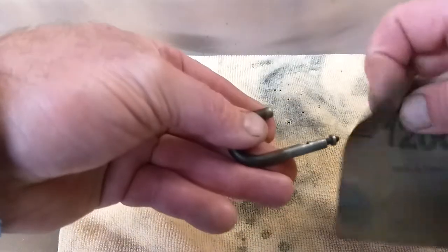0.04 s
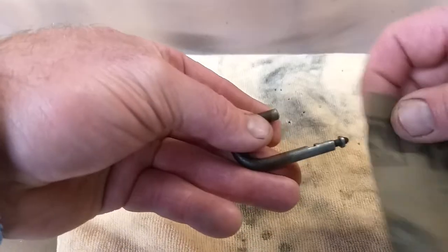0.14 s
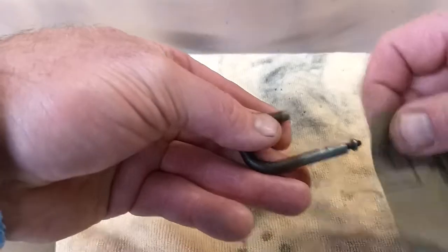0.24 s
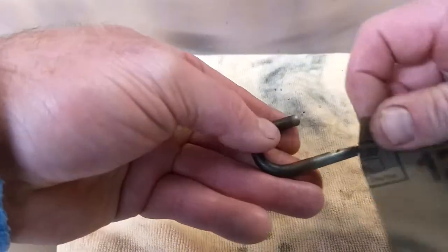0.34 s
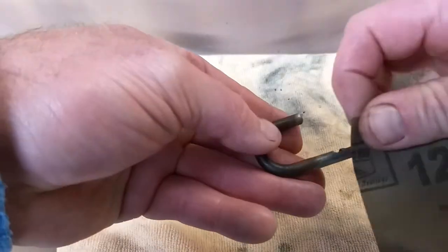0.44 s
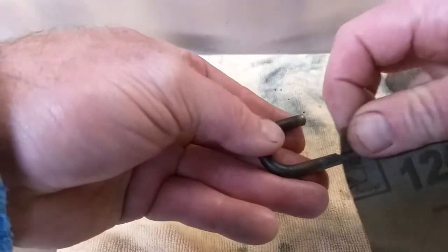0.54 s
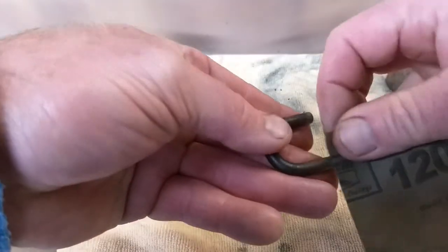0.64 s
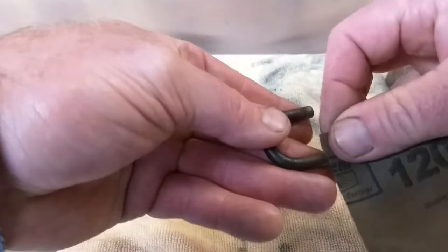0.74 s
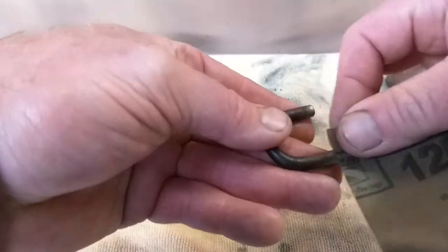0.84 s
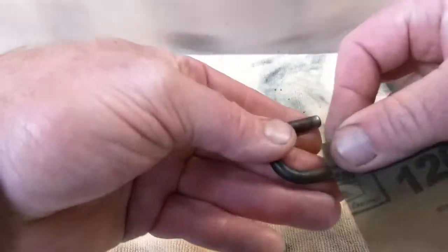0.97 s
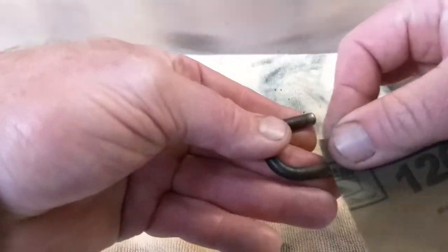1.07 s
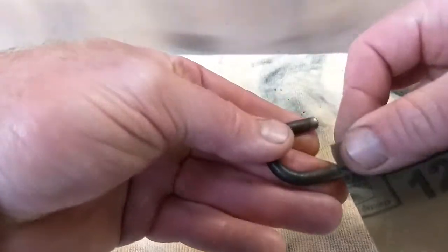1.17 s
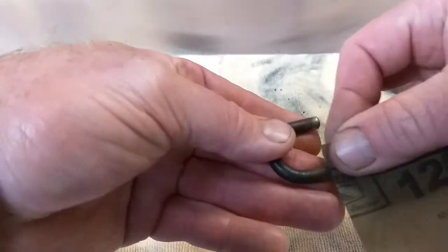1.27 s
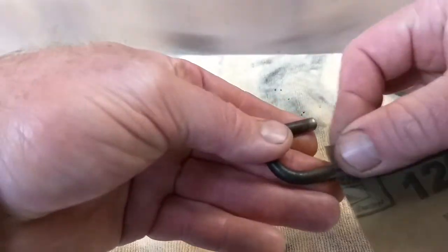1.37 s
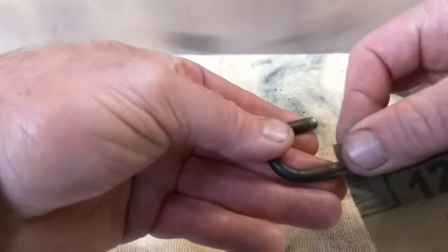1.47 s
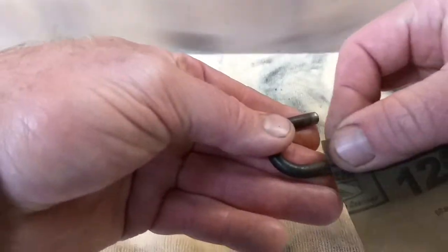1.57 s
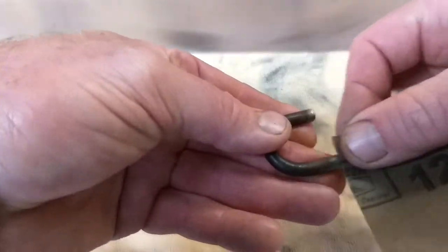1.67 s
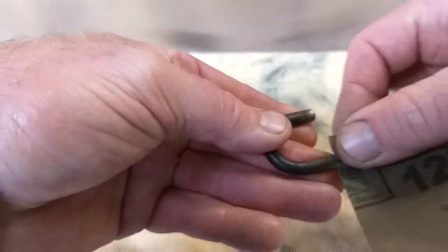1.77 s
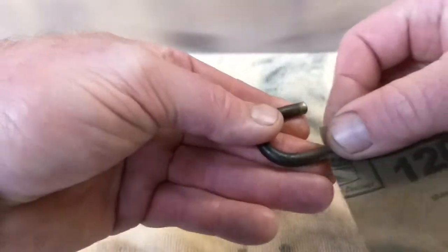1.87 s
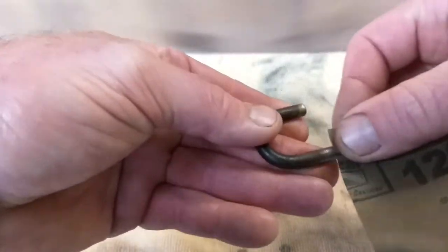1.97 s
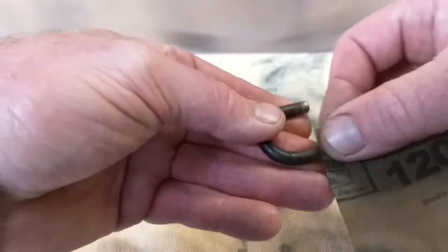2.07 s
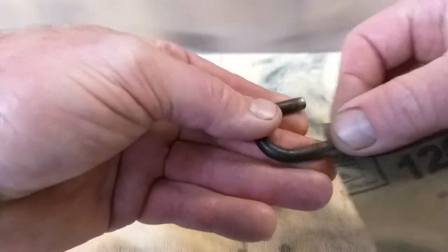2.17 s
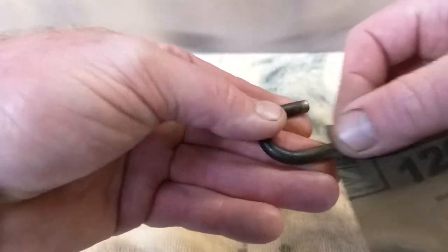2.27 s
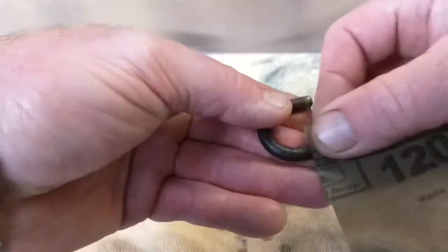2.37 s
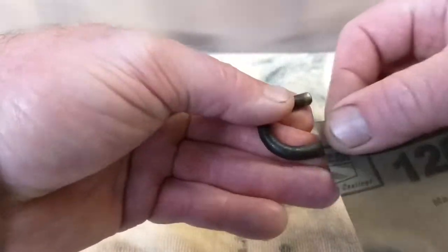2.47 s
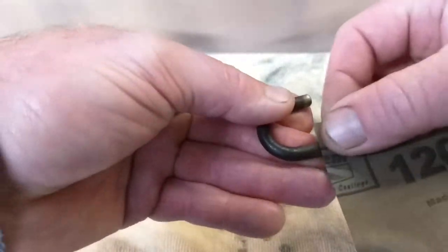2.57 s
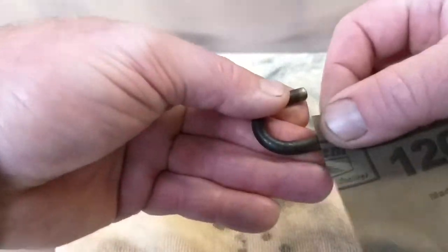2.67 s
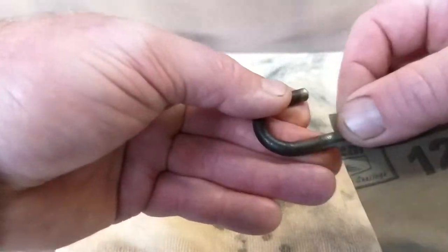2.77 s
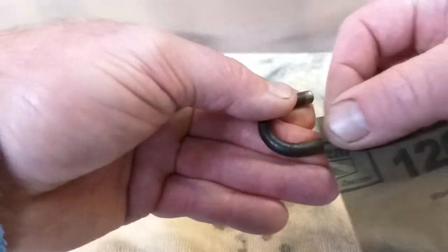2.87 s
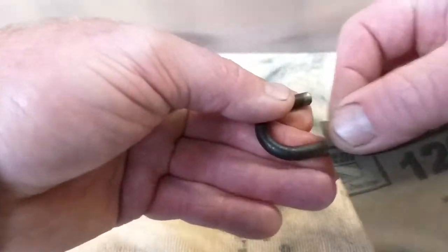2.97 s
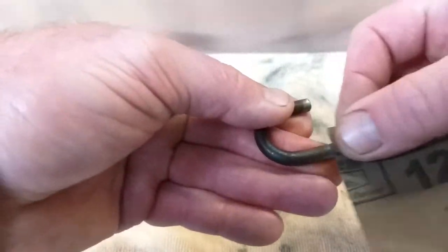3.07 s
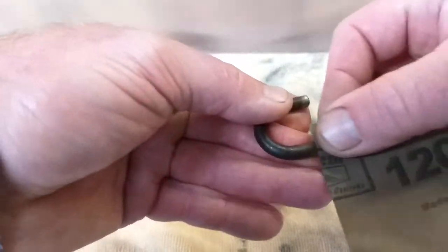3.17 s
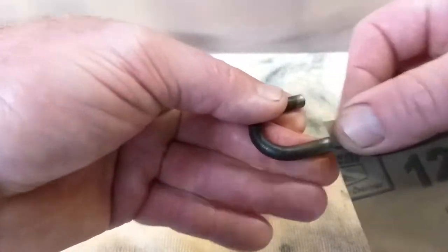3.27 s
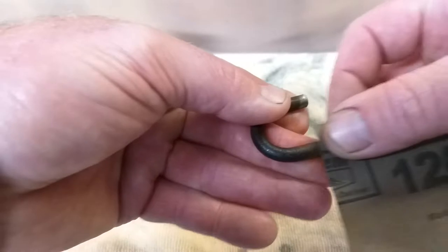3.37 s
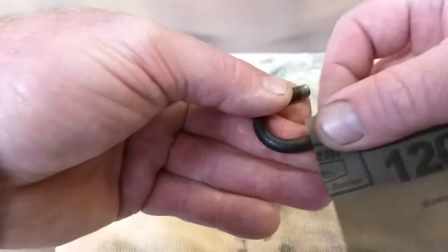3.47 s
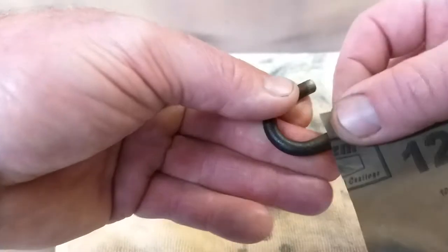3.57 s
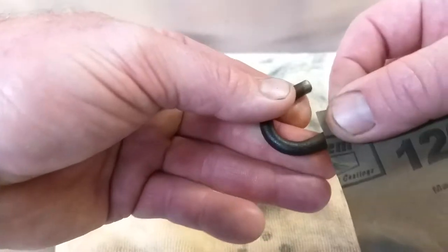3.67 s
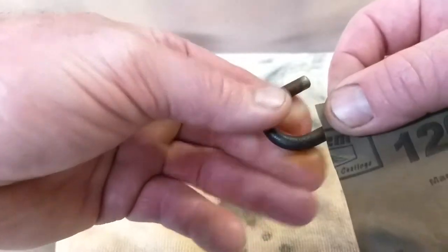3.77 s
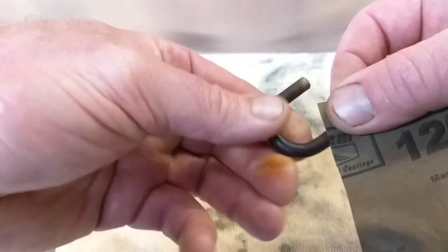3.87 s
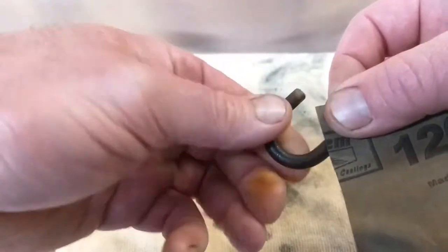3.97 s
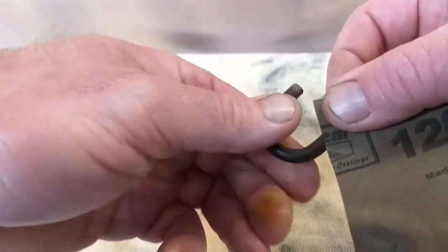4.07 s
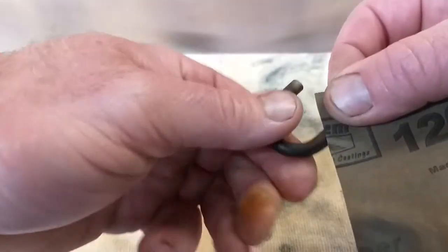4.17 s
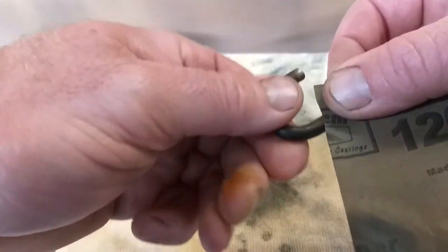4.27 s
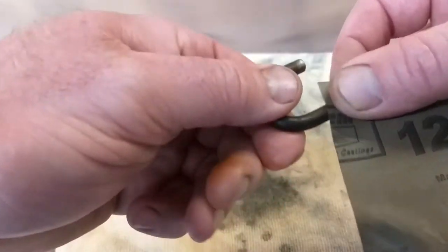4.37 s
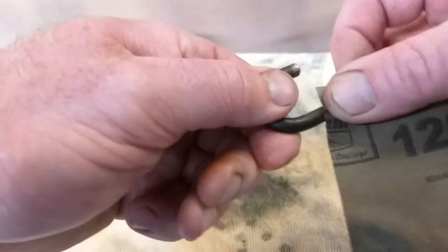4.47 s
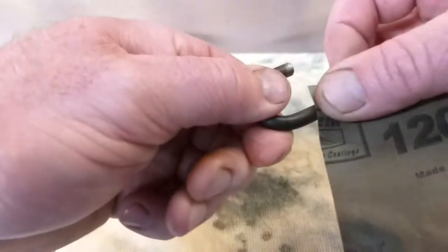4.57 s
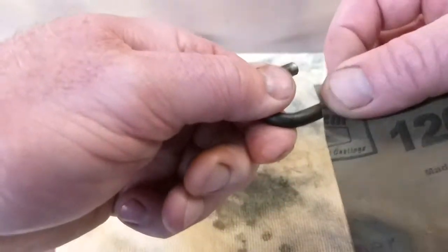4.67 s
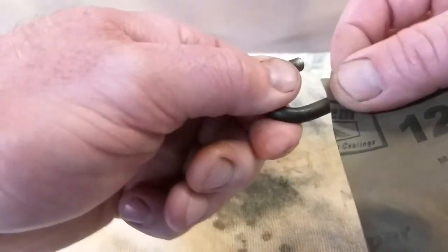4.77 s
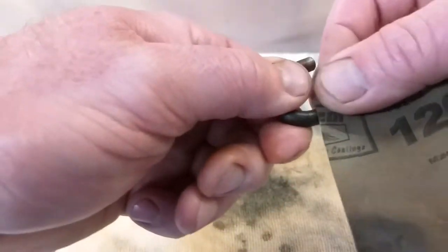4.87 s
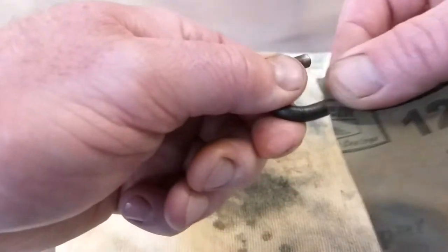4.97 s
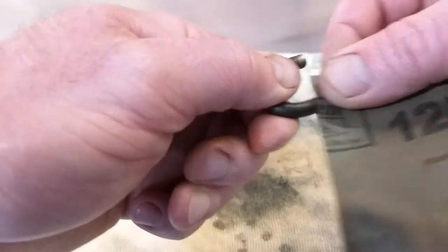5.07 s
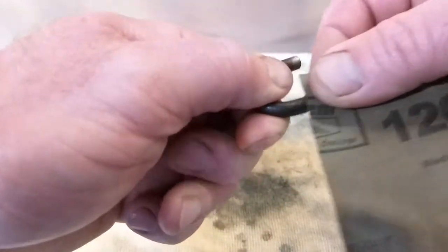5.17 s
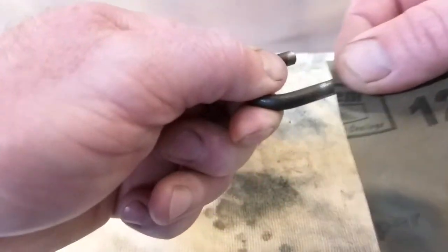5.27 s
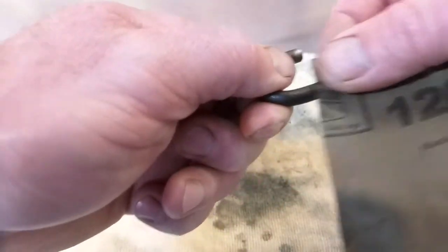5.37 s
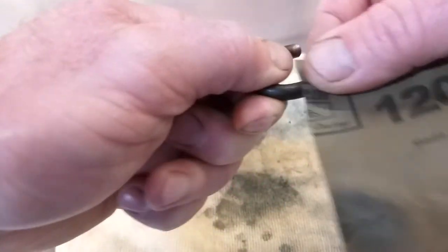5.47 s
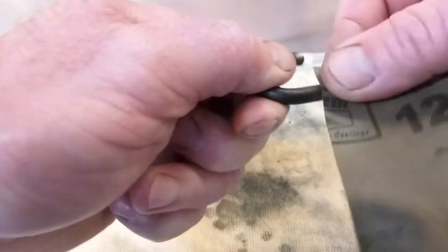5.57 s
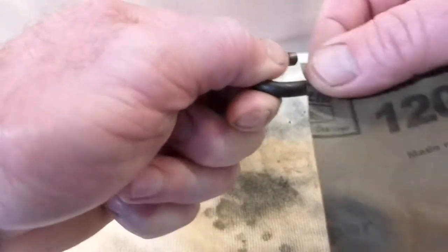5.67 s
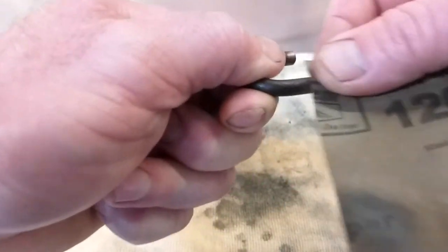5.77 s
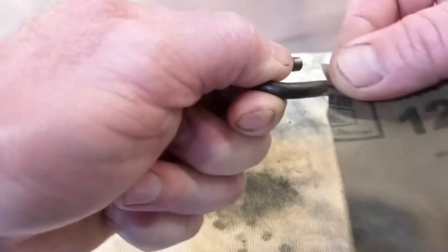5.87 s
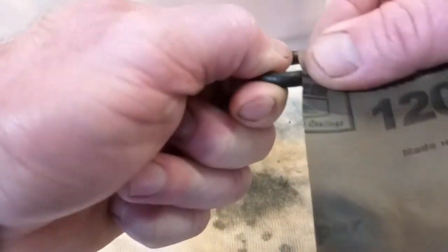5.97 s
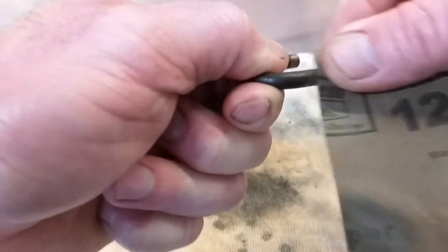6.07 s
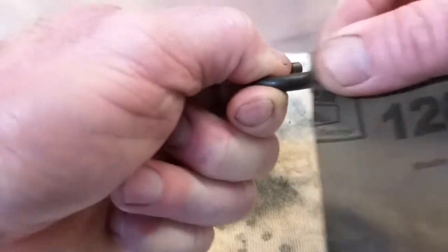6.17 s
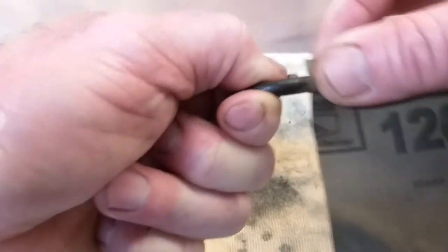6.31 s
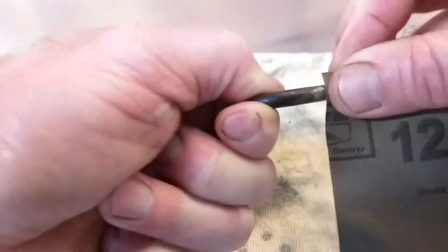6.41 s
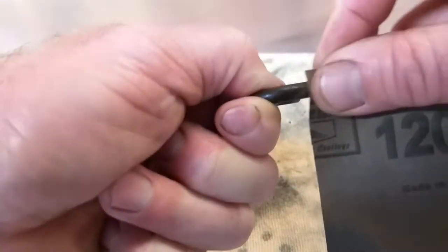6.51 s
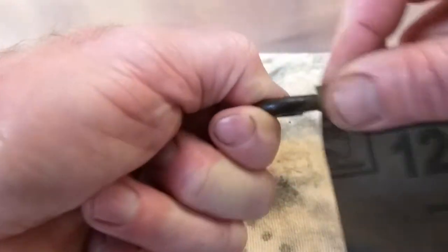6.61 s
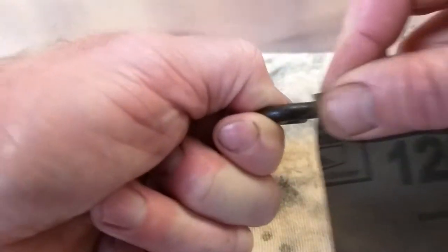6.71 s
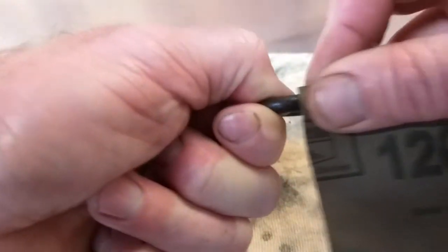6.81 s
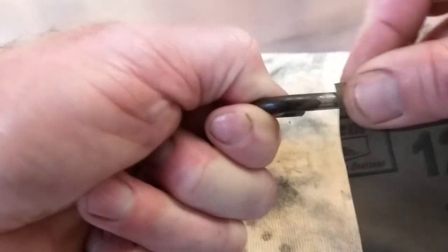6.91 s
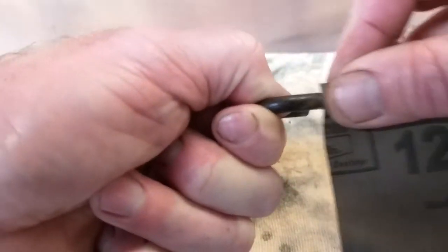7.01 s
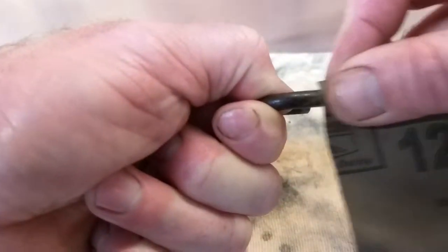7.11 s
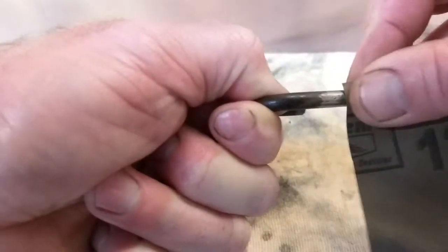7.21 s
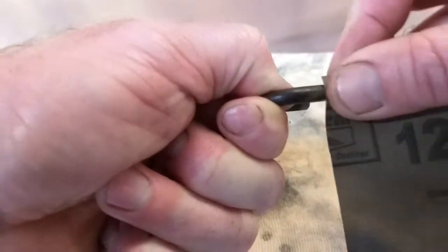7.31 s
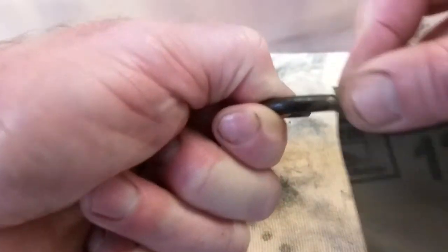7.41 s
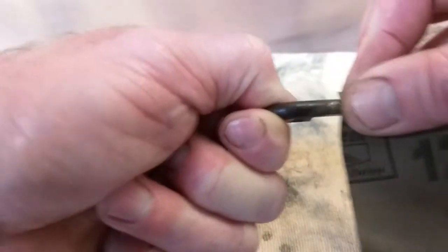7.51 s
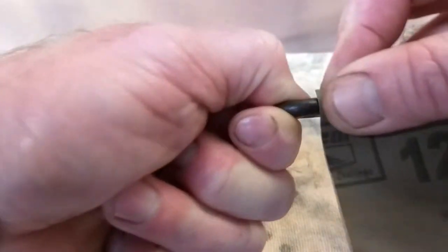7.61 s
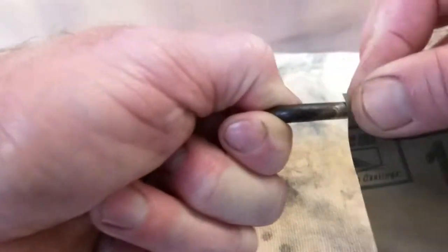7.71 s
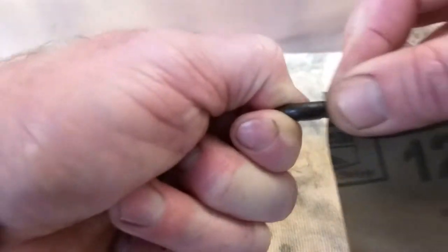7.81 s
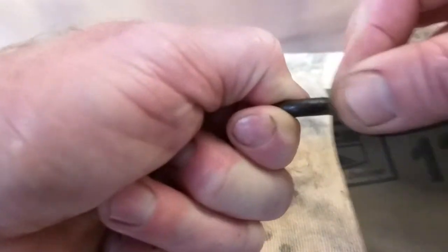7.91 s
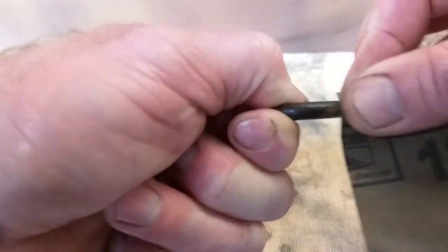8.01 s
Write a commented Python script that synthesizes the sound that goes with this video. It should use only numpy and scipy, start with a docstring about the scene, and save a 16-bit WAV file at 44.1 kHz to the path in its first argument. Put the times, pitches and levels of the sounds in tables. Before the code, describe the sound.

Dry, gritty sanding strokes, seven or eight a second, scrub a thin metal bar, pause while the sheet is regripped, then resume.

```python
"""Abrasive paper is rubbed to and fro on a steel padlock shackle, seven or eight strokes a second, in two spells.
Each stroke is a dense train of random grit impacts, filtered by the spectrum of the sheet in its present grip.
The first pushes swell, while pulls set in more abruptly; before and between the spells the sheet slides in the fingers.
Rustle, skin creeping on steel, snapping grits (short bursts) and small knocks (damped modes) surround the strokes.
A low room tone, a wavering hum that fades and a faint diffuse echo place it in a small workshop, close to a phone."""
import sys
import numpy as np
from scipy import signal
from scipy.fft import rfft, irfft
from scipy.io import wavfile
from scipy.ndimage import uniform_filter1d, map_coordinates

SR = 44100
rng = np.random.default_rng(int(sys.argv[2]) if len(sys.argv) > 2 else 0)


def to_wav(sig):
    """Store sig (one row per channel, or 1-D mono) as 16-bit WAV at the path in sys.argv[1].

    Samples outside -1..1 are clipped; the rate is SR.
    """
    pcm = np.clip(np.atleast_2d(sig), -1, 1) * 32767
    pcm = np.round(pcm).astype(np.int16)
    wavfile.write(sys.argv[1], SR, pcm.T)  # frames by channels


N = 355005
TIME = np.arange(N) / SR


def undb(db):
    """Logarithmic level: decibels become an amplitude gain."""
    return 10 ** (np.asarray(db) / 20)


def unit(x):
    """Normalisation: the signal is scaled to an rms of 1."""
    return x / np.sqrt(np.mean(x ** 2))


def ring(x, response):
    """Linear response: a sound is convolved with an impulse response."""
    return signal.fftconvolve(x, response)[:N]


def colour(points, size=1024):
    """Minimum phase: a folded cepstrum turns (Hz, dB) points into a causal response of unit energy."""
    hz, db = np.transpose(points)
    bins = np.maximum(np.fft.rfftfreq(size, 1 / SR), 1)
    log_gain = np.log(undb(np.interp(np.log(bins), np.log(hz), db)))
    cepstrum = irfft(log_gain)
    cepstrum[1:size // 2] *= 2
    cepstrum[size // 2 + 1:] = 0
    response = irfft(np.exp(rfft(cepstrum)))
    return response / np.linalg.norm(response)


def lowpass(x, hz):
    """Zero-phase filtering: a gentle low-pass runs forwards and backwards, so nothing is delayed."""
    return signal.sosfiltfilt(signal.butter(2, hz, fs=SR, output="sos"), x)


def walk(rate):
    """Slow random modulation: a smoothed chance of rms 1 takes a new value rate times a second."""
    step = max(int(SR / rate), 2)
    held = np.repeat(rng.standard_normal(N // step + 2), step)
    return unit(uniform_filter1d(held, step)[:N])


def swell(middle_s, half_s):
    """Gaussian envelope: a smooth rise and fall with peak 1."""
    return np.exp(-((TIME - middle_s) / half_s) ** 2)


def current(table, s):
    """Piecewise-constant state: the index of the row that holds at time s."""
    return np.maximum(np.searchsorted([row[0] for row in table], s) - 1, 0)


# Strokes of the paper, push and pull in turn, a push first.
# Each row: start in seconds, end in seconds, level in dB.
STROKES = [(.611, .691, -27.5), (.709, .76, -26), (.775, .866, -31.5), (.893, 1.024, -26),
           (1.04, 1.158, -25), (1.205, 1.311, -25.5), (1.338, 1.447, -23), (1.485, 1.586, -25),
           (1.609, 1.717, -24.5), (1.748, 1.832, -28.5), (1.865, 1.964, -25.5), (1.992, 2.102, -24.5),
           (2.13, 2.232, -24), (2.257, 2.365, -21.5), (2.392, 2.49, -28), (2.48, 2.604, -60.5),
           (2.66, 2.781, -29.5), (2.806, 2.918, -25.5), (2.945, 3.045, -24.5), (3.066, 3.178, -26),
           (3.193, 3.315, -27.5), (3.335, 3.448, -26), (3.475, 3.555, -38), (4.793, 4.882, -21),
           (4.913, 5.01, -26.5), (5.04, 5.141, -31.5), (5.165, 5.306, -25.5), (5.316, 5.425, -23),
           (5.458, 5.549, -25), (5.574, 5.682, -32), (5.742, 5.838, -29), (5.868, 5.981, -24.5),
           (6.016, 6.113, -24.5), (6.132, 6.233, -26), (6.265, 6.379, -25.5), (6.408, 6.535, -31.5),
           (6.59, 6.656, -32), (6.679, 6.777, -28.5), (6.801, 6.929, -29.5), (6.958, 7.06, -28.5),
           (7.086, 7.196, -30), (7.219, 7.318, -25.5), (7.377, 7.469, -31), (7.49, 7.591, -24),
           (7.619, 7.716, -26.5), (7.742, 7.84, -24.5), (7.887, 7.977, -30), (7.996, 8.1, -27)]
# The hand's manner, from cautious swelling strokes to brisk square ones.
# Each row: valid from in seconds, lean of a push in dB, lean of a pull in dB (level gained from start to end),
# mean roundness (no unit, higher is more pointed), mean low body in dB, top edge of a push in dB, of a pull in dB.
MANNERS = [(.55, 11.5, 8, 1.03, 4, -4.5, -3), (1.33, 6, -2, 0.67, .5, -3.8, -1.7),
           (2.62, 5.5, -2.5, 0.62, .7, -1.3, -2), (4.6, 0, 1, 0.59, 2, -3.5, 1.5),
           (5.71, 0.5, 0.5, 0.47, 3.2, -6, 1), (6.55, -2, 2, 0.34, -3.5, -1, -2),
           (7.21, 0, -2.5, 0.35, 1.5, -3.5, -1.3)]
# The sheet slides in the fingers while a new grip is found.
# Each row: start in seconds, end in seconds, level in dB, lean in dB, dullness (gain of the low body) in dB.
SLIDES = [(-.03, 0.099, -37, -7, 6), (0.047, .073, -33.5, -6, -2), (.071, 0.145, -32.5, 3, 3.5),
          (0.113, 0.23, -40.5, -18, 0.5), (0.236, 0.284, -32.5, -5, -10), (.275, 0.317, -44.5, -2, 4.5),
          (0.373, .416, -38, 4, -13), (.604, 0.633, -40, -6.5, 3), (3.544, 3.619, -35.5, 13, -2.5),
          (3.684, 3.734, -47, 20, -8), (3.74, 3.791, -55, -8, -4), (3.831, 3.912, -35, -19.5, 2),
          (3.878, 4.012, -41, 12.5, 6.5), (4.091, 4.151, -43, -3, 8.5), (4.174, 4.3, -43.5, -6, 5),
          (4.278, 4.417, -29.5, 18, 3), (4.654, 4.71, -52, -8, -3), (4.702, 4.755, -39.5, 9, 2.5),
          (6.551, 6.604, -46, 14, 1)]


def rubs(usual_db=-26, light_body=0.77, light_limit_db=7.5, push_rounder=1.28, push_body_db=1.5,
         push_skew=-.05, pull_skew=.3, slide_roundness=1.07, slide_edge_db=-1.5, slide_edge_loss=0.47):
    """Alternating motion: strokes, then slides, as (start, end, level, lean, roundness, skew, body, edge)."""
    for k, (start, end, db) in enumerate(STROKES):
        manner = MANNERS[current(MANNERS, (start + end) / 2)]
        _, push_lean, pull_lean, roundness, body_db, push_edge, pull_edge = manner
        # a stroke lighter than usual gains body (dB per dB), up to a limit
        body_db = body_db + min(light_body * (usual_db - db), light_limit_db)
        # a push is rounder and fuller than the mean, a pull squarer and thinner by as much
        # skew above 0 makes a stroke start abruptly and ease out
        if k % 2 == 0:
            yield (start, end, db, push_lean, roundness * push_rounder, push_skew,
                   body_db + push_body_db, push_edge)
        else:
            yield (start, end, db, pull_lean, roundness / push_rounder, pull_skew,
                   body_db - push_body_db, pull_edge)
    for start, end, db, lean_db, dull_db in SLIDES:
        # a dull slide loses top edge (dB per dB)
        edge_db = slide_edge_db - slide_edge_loss * dull_db
        yield start, end, db, lean_db, slide_roundness, 0, dull_db, edge_db


def grits(speed, slow_rate=5000, fast_rate=34000, scatter_db=1.0):
    """Random impact noise: grits strike sparsely at the turns and merge into a dense hiss at full speed."""
    chance = np.clip((slow_rate + fast_rate * speed) / SR, 0, 1)
    # rarer hits are stronger, which keeps the mean power even
    hits = (rng.random(N) < chance) / np.sqrt(chance)
    return unit(hits * rng.standard_normal(N) * undb(scatter_db * rng.standard_normal(N)))


def flexing(x, first_s=.0008, spacing=1.7, share=0.093, sway=0.1003, count=4):
    """Comb interference: sheet edges and fingers return short echoes whose delays shift as the paper bends."""
    out = x.copy()
    for k in range(count):
        delay = first_s * spacing ** k * (1 + sway * walk(4))
        out += share * map_coordinates(x, [(TIME - delay) * SR], order=3)
    return unit(out)


# Relative spectra that the sheet radiates in each grip; colour() scales them to unit energy.
# Each row: frequency in Hz, level in dB.
SHEET_SHIFTED = [(290, -43), (500, -19.5), (658, -12.5), (1090, -15), (1970, -3), (3890, 0), (4630, -1),
                 (9810, -5), (10900, -6.5), (12500, -3.5), (15800, -11)]
SHEET_ON_NOTCH = [(290, -56), (500, -31.5), (760, -34), (1000, -24.5), (1160, -24), (1970, -8.5),
                  (2600, -12.5), (2960, -7), (3620, -12), (3950, -2.5), (4560, -1), (5750, 1), (6900, -1.5),
                  (9120, 2.5), (10500, -3), (15800, -11)]
SHEET_ON_SHANK = [(290, -65), (500, -36), (1030, -35.5), (1270, -24.5), (1650, -20.5), (1900, -12.5),
                  (2500, -18), (2970, -9), (3580, -17.5), (4020, -6.5), (5050, -6.5), (5750, 0.5),
                  (7030, -8.5), (9240, -1.5), (15500, -15)]
SHEET_ON_BEND = [(290, -56), (500, -36), (553, -25), (851, -27.5), (954, -23), (1410, -19.5), (1930, -6.5),
                 (2460, -14.5), (2970, -4.5), (3480, -12), (4250, -2), (5830, -1.5), (7130, -4.5),
                 (8850, -0.5), (15500, -16)]
SHEET_LOOSE = [(290, -55), (500, -24), (771, -29.5), (891, -21), (1630, -13.5), (1890, -9.5), (2210, -7.5),
               (2830, -13.5), (3470, -4.5), (4000, -4.5), (4690, 1.5), (6180, -0.5), (6640, 1),
               (12400, -6.5), (15800, -13.5)]
SHEET_PRESSED = [(290, -59), (500, -30.5), (1030, -21), (1130, -20), (2160, -7), (2930, -11.5), (3680, -4),
                 (4190, -7), (5430, -2.3), (6270, -4), (7670, 0), (9240, 1), (10700, -7), (12900, -4.5),
                 (15500, -11.5)]
SHEET_BY_FIST = [(290, -51), (500, -28), (686, -29), (982, -17.5), (1270, -22.5), (2200, -3.5),
                 (2430, -7.5), (2720, -14), (3060, -8), (3680, 0), (5130, -2), (5750, -2.5), (9110, 1.5),
                 (10800, -2.5), (15500, -6.5)]
SHEET_NEAR_TIP = [(290, -42), (450, -25), (650, -11), (900, -15.5), (1300, -14.5), (2000, 3), (2700, -7.5),
                  (3600, 3), (5000, 0), (5600, 5), (7300, 1.5), (8700, 5.5), (11000, -1.5), (13300, -3.5),
                  (15800, -8)]
SHEET_ON_TIP = [(290, -39.5), (550, -20), (880, -27), (1160, -19.5), (2150, -6.5), (2600, -13.5),
                (3080, -15.5), (3400, -3), (4900, -4.5), (5750, 1.5), (7140, -1.5), (8900, 2),
                (10200, -4.5), (13500, -4), (15800, -12.5)]
# Successive grips of the sheet; both levels hold before the movement of the hands scales them.
# Each row: valid from in seconds, rustle of the held sheet in dB, skin rubbing on the steel in dB,
# spectrum of the sheet as (Hz, dB) points.
GRIPS = [(-1, -57, -72, SHEET_SHIFTED), (0.63, -58, -73, SHEET_ON_NOTCH),
         (1.96, -57.5, -73.5, SHEET_ON_SHANK), (2.62, -65, -73, SHEET_ON_BEND),
         (3.5, -65, -77.5, SHEET_LOOSE), (5, -60.5, -69, SHEET_PRESSED), (6, -58, -66, SHEET_BY_FIST),
         (6.5, -62, -68, SHEET_NEAR_TIP), (7, -69, -68, SHEET_ON_TIP)]


def sanding(body_hz=2700, edge_hz=9800, judder_db=0.85, chatter_db=0.05, turn_body_db=3, bite_s=0.003):
    """Friction excitation: strokes that speed up and stop drive the sheet's spectrum through grit impacts."""
    speed = np.zeros(N)
    force = np.zeros((len(GRIPS), 3, N))  # per grip: body, middle and edge bands
    for start, end, db, lean_db, roundness, skew, body_db, edge_db in rubs():
        span = (TIME > start) & (TIME < end)
        travel = (TIME[span] - start) / (end - start)
        speed[span] = np.sin(np.pi * travel)
        # the paper flexes for a moment before the grit bites fully
        bite = 1 - np.exp(-(TIME[span] - start) / bite_s)
        shape = speed[span] ** (roundness * (1 + skew * (2 * travel - 1)))
        push = undb(db + lean_db * (travel - .5)) * shape * bite
        grip = current(GRIPS, (start + end) / 2)
        force[grip][:, span] += undb([[body_db], [0], [edge_db]]) * push
    # the paper drags unevenly: a slow judder of the hand and a quick chatter of the contact
    unevenness = undb(judder_db * walk(70) + chatter_db * walk(600))
    scrape = flexing(grits(speed)) * unevenness
    body, below_edge = lowpass(scrape, body_hz), lowpass(scrape, edge_hz)
    # slow grits push longer, so the rasp is duller near the turns
    turning_body = body * undb(turn_body_db * (0.7 - speed))
    bands = np.array([turning_body, below_edge - body, scrape - below_edge])
    return sum(ring((push * bands).sum(axis=0), colour(sheet)) for push, (*_, sheet) in zip(force, GRIPS))


def stirring(settle_s, audible_db=-52, at_rest=.035):
    """Running average: how much the hands move, near 0 in long pauses and towards 1 in steady motion."""
    spans = [(TIME > start) & (TIME < end) for start, end, db, *_ in rubs() if db > audible_db]
    moving = np.any(spans, axis=0)
    return at_rest + uniform_filter1d(moving * 1., int(settle_s * SR))


# Dull relative spectrum of skin rubbing on steel.
# Each row: frequency in Hz, level in dB.
SKIN_COLOUR = [(40, -23.5), (120, -7), (220, -3.5), (320, -4.5), (600, -7.5), (950, -4), (1600, -6),
               (5000, -39.5)]
# The steel slips in the fingers, swelling and fading.
# Each row: middle in seconds, half width in seconds, level in dB.
SLIPS = [(.02, .08, -65), (.46, .04, -68), (4.35, .05, -68), (5.65, 0.032, -62), (6.08, .04, -56.5),
         (6.2, 0.067, -55.5)]


def handling(skin_uneven_db=3, rustle_uneven_db=2.5, tick_db=-7, sheet_settle_s=0.12, skin_settle_s=0.0353,
             groan_s=6.2, groan_half_s=0.025, groan_hz=213, groan_db=-54, groan_waver=.05):
    """Sliding friction: steel creeps on the skin while the held sheet rustles on and stray grits tick."""
    rustle, skin_gain = undb([row[1:3] for row in GRIPS])[current(GRIPS, TIME)].T
    slips = sum(undb(db) * swell(s, half_s) for s, half_s, db in SLIPS)
    creep = skin_gain * stirring(skin_settle_s) + slips
    skin = ring(grits(0) * creep * undb(skin_uneven_db * walk(30)), colour(SKIN_COLOUR))
    # once a fingertip sticks and slips fast enough to give a low tone
    groan_phase = 2 * np.pi * np.cumsum(groan_hz * (1 + groan_waver * walk(60.1))) / SR
    groan = np.sin(groan_phase) * undb(groan_db) * swell(groan_s, groan_half_s)
    ticks = undb(tick_db) * grits(0, slow_rate=83, scatter_db=5.5)
    crackle = grits(0, slow_rate=3600, scatter_db=0.5) + ticks
    crackle = crackle * rustle * stirring(sheet_settle_s) * undb(rustle_uneven_db * walk(60))
    return skin + groan + ring(crackle, colour(SHEET_LOOSE))


# Relative spectrum of the room tone, scaled to unit rms before its level is set.
# Each row: frequency in Hz, level in dB.
ROOM_TONE = [(20, -24), (40, -21), (55, -3.5), (105, -0.5), (160, -7.5), (250, -15.5), (500, -14.5),
             (1000, -35.5), (3000, -28.5), (8000, -29.5), (15800, -43)]


def background(tone_db=-71.5, hum_hz=107, hum_db=-68, hum_fade_db=-4.0, hum_waver=0.0202):
    """Stationary noise and frequency modulation: room tone and a wavering hum that fades (dB a second)."""
    noise = ring(rng.standard_normal(N), colour(ROOM_TONE, size=8192))
    tone = unit(noise) * undb(tone_db + walk(1.2))
    hum = np.sin(2 * np.pi * np.cumsum(hum_hz * (1 + hum_waver * walk(10))) / SR)
    return tone + hum * undb(hum_db + hum_fade_db * TIME + 2 * walk(9))


# Knocks and soft bumps of the hands.
# Each row: time in seconds, strength of the push in dB, approximate contact time in seconds.
KNOCKS = [(.025, -27, 0.0039), (.033, -33, .0077), (.121, -37.5, .0006), (.4129, -28.5, 0.00022),
          (.424, -31, 0.00034), (.428, -26, .0017), (.471, -46, 0.0014), (.612, -45, .0036),
          (3.545, -47, 0.00045), (5.123, -47, .00027), (6.57, -35, 0.007), (7.51, -36, .0062),
          (7.62, -39, 0.0048)]
# Damped modes that the knocks ring with.
# Each row: frequency in Hz, time to decay by 60 dB in seconds, level in dB.
KNOCK_MODES = [(123, 0.058, -15), (215, 0.032, -13), (264, 0.033, -4.5), (440, 0.052, -29),
               (585, 0.015, -6), (677, 0.017, -6), (794, 0.011, -12), (1330, 0.0049, -4), (1940, 0.013, 0),
               (2000, 0.023, -8), (2700, 0.0091, -3), (3700, 0.0091, 1)]


def knocks(clatter_db=-7, clatter_t60=0.042, clatter_hz=2200):
    """Modal excitation: short pushes strike a damped body; a longer contact wakes only its low modes."""
    pushes, t = np.zeros(N), TIME[:SR // 4]
    for s, db, contact_s in KNOCKS:
        push = np.hanning(int(contact_s * SR) + 3)
        pushes[int(s * SR):][:len(push)] += undb(db) * push / push.sum()
    modes = np.zeros(len(t))
    for hz, t60, db in KNOCK_MODES:
        modes += undb(db) * np.cos(2 * np.pi * hz * t) * np.exp(-np.log(1000) * t / t60)
    # many weaker modes blur into a short clatter
    noise = unit(lowpass(rng.standard_normal(len(t)), clatter_hz))
    clatter = noise * np.exp(-np.log(1000) * t / clatter_t60)
    return lowpass(ring(pushes, modes + undb(clatter_db) * clatter), 4200)


# Single large grits snapping free.
# Each row: time in seconds, height of the click before the sheet colours it in dB.
SNAPS = [(.052, -24), (.12, -16), (.322, -30), (.605, -15.5), (1.185, -25), (2.139, -23), (2.533, -25.5),
         (2.7425, -10), (3.743, -26.5), (4.02, -29), (4.683, -22.5), (4.923, -16), (5.325, -14),
         (6.551, -25)]


def snaps(crumble_db=-17, crumble_s=0.0015):
    """Impulsive release: a large grit lets go with a click and a few smaller ones follow."""
    clicks, t = np.zeros(N), TIME[:1024]
    for s, db in SNAPS:
        burst = undb(crumble_db) * rng.standard_normal(len(t)) * np.exp(-t / crumble_s)
        burst[0] = 1
        clicks[int(s * SR):][:len(t)] += undb(db) * burst
    return ring(clicks, colour(SHEET_PRESSED))


def workshop(x, wet_db=-27, split_hz=4500, low_db=3, low_t60=.36, high_t60=.25, onset_s=0.016):
    """Diffuse reverberation: decaying noise is the faint echo of the small room; the treble dies first."""
    t = TIME[:SR // 2]
    noise = rng.standard_normal(len(t))
    low = lowpass(noise, split_hz)
    low_tail = undb(low_db) * low * np.exp(-np.log(1000) * t / low_t60)
    high_tail = (noise - low) * np.exp(-np.log(1000) * t / high_t60)
    tail = (low_tail + high_tail) * (1 - np.exp(-t / onset_s))
    return undb(wet_db) * ring(x, tail / np.linalg.norm(tail))


def scene():
    """Superposition: the hands work straight in front of the phone, so both channels hear the same sum."""
    near = sanding() + handling() + snaps() + knocks()
    return np.tile(near + workshop(near) + background(), (2, 1))


# The two microphone channels differ in two narrow bands.
# Each row: centre in Hz, width in Hz, left minus right at the centre in dB.
PORTS = [(1920, 140, 4.5), (9440, 320, -5.8)]


def record(dry, low_cut_hz=48, top_hz=15750):
    """Band limiting: the phone drops the deepest bass, colours each channel slightly and cuts the top."""
    dry = signal.sosfilt(signal.butter(4, low_cut_hz, "high", fs=SR, output="sos"), dry)
    hz = np.fft.rfftfreq(N, 1 / SR)
    # complex decibels carry the phase along with the level
    difference_db = sum(db / (1 + 1j * (hz - centre) / width) ** 2 for centre, width, db in PORTS)
    stereo = irfft(rfft(dry) * undb(np.array([difference_db, -difference_db]) / 2), N)
    return signal.sosfiltfilt(signal.ellip(10, .05, 60, top_hz, fs=SR, output="sos"), stereo)


dry = scene()
out = record(dry)
to_wav(out)
```